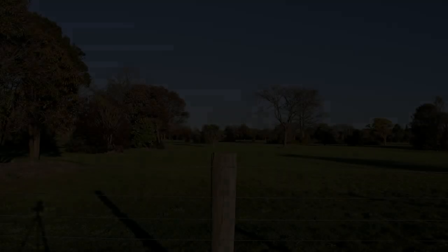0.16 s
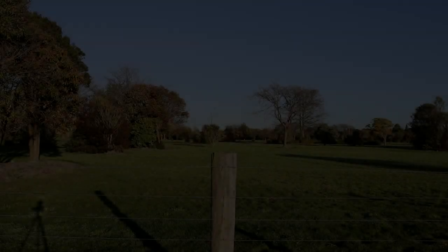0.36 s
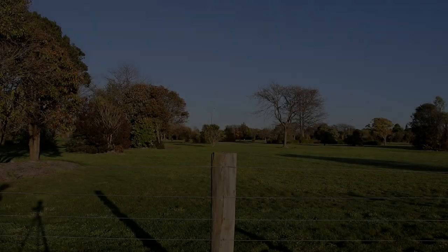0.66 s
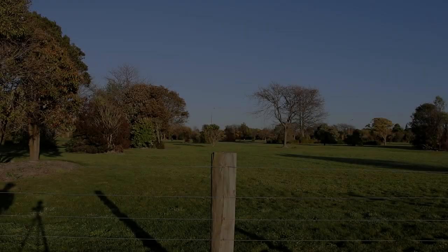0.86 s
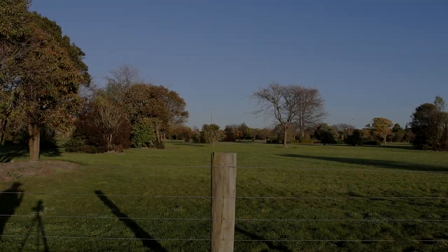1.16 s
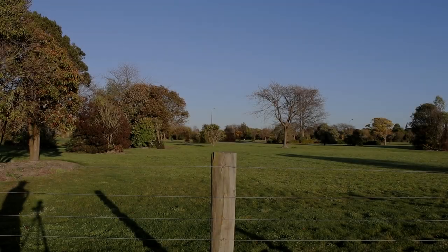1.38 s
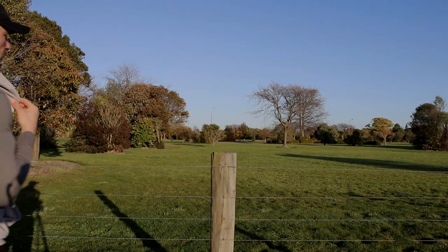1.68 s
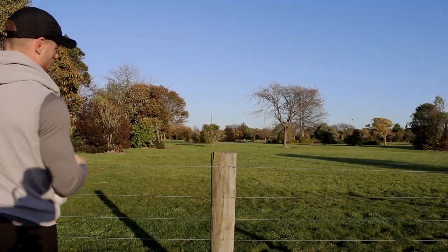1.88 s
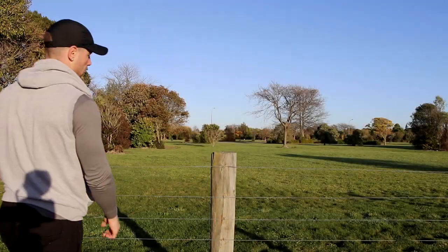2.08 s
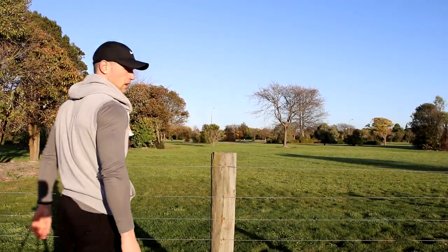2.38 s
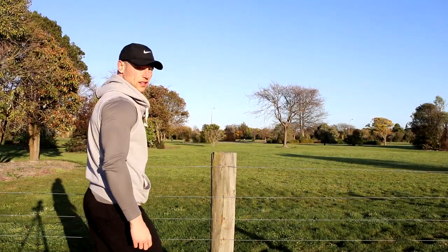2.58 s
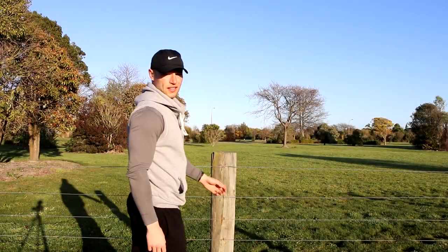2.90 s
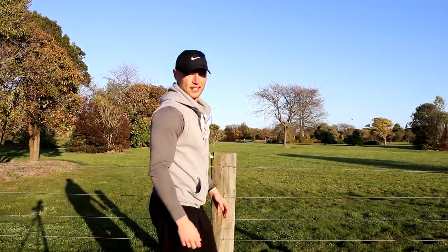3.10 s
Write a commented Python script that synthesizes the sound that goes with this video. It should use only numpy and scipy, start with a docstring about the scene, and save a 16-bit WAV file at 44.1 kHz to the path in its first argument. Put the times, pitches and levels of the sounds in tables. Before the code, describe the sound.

Footsteps on damp grass: soft brushing from 0.3 to 0.75 seconds, a light step near 1.1, then close, crisp crunches around 1.65-1.9, 2.3-2.5 and 2.8-2.95, with cracking stalks and wet turf pops. Low wind rumble buffets the microphone in uneven gusts, strongest near 2.7, over faint open-park air and hiss. A distant bird chirps sparsely early on, then four quick falling chirps from 3.0.

```python
"""Wind rumbles on the microphone over the faint wash of an open park: coloured noise under gust levels.
A small bird far off chirps and whistles now and then: near-pure notes that slide down.
Someone walks over damp grass from behind the microphone and stops close to it. Shoes brush and crush
the blades (coloured showers of clicks), stiff stalks crack (noise bursts) and the wet turf pops under
the weight (short damped rings with gritty ticks). Four more chirps come near the end."""
import sys
import numpy as np
from scipy import signal
from scipy.fft import rfft, irfft
from scipy.io import wavfile
from scipy.ndimage import uniform_filter1d

SR = 44100
rng = np.random.default_rng(int(sys.argv[2]) if len(sys.argv) > 2 else 0)


def transcribe(u):
    """Save the signal u as a 16-bit wav file named by the first command-line argument.

    u: samples, shape (n,) or (channels, n), limited to [-1, 1]; the rate is SR.
    q: integer samples, one column per channel.
    """
    v = np.clip(np.atleast_2d(u).T, -1, 1)
    q = np.round(v * 32767).astype(np.int16)
    wavfile.write(sys.argv[1], SR, q)


N = 143325


def amp(db):
    """Decibels to gain."""
    return 10 ** (np.asarray(db) / 20)


def evened(x):
    """Scales to rms 1."""
    return x / np.sqrt(np.mean(x ** 2) + 1e-20)


def read(points, hz):
    """Reads a table on a log-frequency axis."""
    f, value = np.transpose(points)
    return np.interp(np.log(hz + 1), np.log(f + 1), value)


def add(mix, s, sound):
    """Mixes a sound in at time s, in place."""
    part = mix[max(round(s * SR), 0):][:len(sound)]
    part += sound[:len(part)]


def noise(spectrum):
    """Steady noise of rms 1 with the given colour."""
    gain = amp(read(spectrum, np.fft.rfftfreq(N, 1 / SR)))
    white = rng.standard_normal(N)
    return evened(irfft(rfft(white) * gain, N))


def colour(x, spectrum, size=2048):
    """Causal (minimum-phase) filter of unit energy, so that clicks keep their sharp start."""
    hz = abs(np.fft.fftfreq(size, 1 / SR))
    log_gain = np.log(amp(read(spectrum, hz)))
    response = np.exp(np.conj(signal.hilbert(log_gain)))
    taps = np.fft.ifft(response).real[:size // 2]
    return signal.oaconvolve(x, taps / np.linalg.norm(taps))[:N]


def drift(step_s):
    """A random curve of rms 1 that heads for a new value every step."""
    steps = np.arange(N) / SR / step_s
    return evened(np.interp(steps, np.arange(N), rng.standard_normal(N)))


def grass():
    """Each stroke bends hundreds of blades in clumps, dull sole to fine fizz; they spring back faintly."""
    # shoe strokes through the grass: start_s, length_s, then the levels before the colour shifts:
    # sole_db (soft press), crunch_db, rustle_db, swish_db, fizz_db
    strokes = [(0.305, 0.092, -87, -62, -63.5, -63, -66), (0.36, 0.064, -83, -69, -75, -61, -54),
               (0.489, 0.11, -52, -54.5, -55.5, -58.5, -62), (0.637, 0.13, -62, -71, -63, -64, -70),
               (1.121, 0.11, -48, -53, -53.5, -57, -63), (1.234, 0.11, -85, -71, -66, -62, -63),
               (1.637, 0.072, -50, -52.5, -54.5, -53.5, -59), (1.688, 0.086, -42, -51, -54, -60, -63),
               (1.743, 0.035, -39, -40, -55, -61, -64), (1.758, 0.13, -56.5, -50, -57, -58, -71),
               (2.276, 0.097, -45, -42.5, -50, -54.5, -60), (2.368, 0.082, -51, -40.5, -45, -58, -72),
               (2.456, 0.068, -67, -83, -84, -61, -66), (2.806, 0.065, -41, -48.5, -50.5, -60, -55),
               (2.856, 0.072, -47, -40, -46.5, -54.5, -63)]
    # colours from the press of the sole up through the bending blades: frequency_hz, relative_level_db
    sole = [(100, 0.5), (250, 6), (600, 0.5), (900, -3.5), (2000, -27.5)]
    crunch = [(300, -25.5), (800, 3), (1400, 6), (2200, 5.5), (3200, -0.5), (5000, -48)]
    rustle = [(1500, -20), (2900, 2.5), (4500, 4.5), (5600, 5), (6700, -5), (10000, -13)]
    swish = [(4500, -4), (7300, 8.5), (8800, 7.5), (10800, -1.5), (14000, -29)]
    fizz = [(9000, -10), (11500, -3.5), (12700, -7), (16000, -17)]
    blades_per_s, blade_spread_db = 8000, 5
    clump_db, own_clump_db, clump_s = 3, 1.5, .003  # shared by all layers; each layer's own; step
    attack_share, release_share = .38, .33  # of the stroke length
    recover_db, recover_s = -17, 0.081  # blades springing back after the stroke

    shared_clumps_db = clump_db * drift(clump_s)
    out = np.zeros(N)
    t = np.arange(SR // 2) / SR
    for k, spectrum in enumerate([sole, crunch, rustle, swish, fizz]):
        clumps_db = shared_clumps_db + own_clump_db * drift(clump_s)
        blade_db = blade_spread_db * np.minimum(rng.exponential(1, N), 4)
        is_blade = rng.random(N) < blades_per_s / SR
        blades = amp(clumps_db + blade_db) * rng.choice([-1, 1], N) * is_blade
        drive = np.zeros(N)
        for start, length, *levels_db in strokes:
            u = t / length
            slope = np.minimum(u / attack_share, (1 - u) / release_share)
            press = np.sin(np.pi / 2 * np.clip(slope, 0, 1)) ** 2
            fade = np.exp(-np.maximum(t - length, 0) / recover_s)
            recover = amp(recover_db) * np.minimum(u, 1) * fade
            under_shoe = np.roll(blades, -int(start * SR))[:len(t)]
            stroke = np.maximum(press, recover) * under_shoe
            add(drive, start, amp(levels_db[k]) * stroke / np.std(stroke[u < 1]))
        out += colour(drive, spectrum)
    return shifting(out)


def shifting(x, size=128):
    """Each clump of blades rings at other pitches: random patches of colour come and go."""
    shift_db, shift_hz, shift_s = 2, 1200, .014  # rms depth; width of the smoothing in pitch; in time / 2
    z = signal.stft(x, nperseg=size)[2]
    patches = rng.standard_normal(z.shape)
    patches = uniform_filter1d(patches, round(shift_hz * size / SR), axis=0)
    patches = uniform_filter1d(patches, round(2 * shift_s * SR / size), axis=1)
    gain = amp(shift_db * evened(patches))
    return signal.istft(z * gain, nperseg=size)[1][:N]


def stalks():
    """A stiff stalk flicks off the shoe with a short, bright crack: a decaying noise burst."""
    # cracks: start_s, level_db (before colouring)
    snaps = [(.533, -34), (1.667, -29), (1.672, -30), (1.6825, -24), (1.6868, -24), (1.7122, -26),
             (1.7928, -31), (2.4945, -29), (2.8385, -24), (2.868, -29), (3.1603, -36)]
    # colour of a crack: frequency_hz, relative_level_db
    snap_colour = [(1000, -5), (2600, 3.5), (6400, -4.5), (8900, 3.5), (11000, -13.5), (12700, -3),
                   (15500, -3)]
    snap_s = .0011  # decay time
    t = np.arange(0, 10 * snap_s, 1 / SR)
    out = np.zeros(N)
    for start, db in snaps:
        burst = rng.standard_normal(len(t))
        add(out, start, amp(db) * burst * np.exp(-t / snap_s))
    return shifting(colour(out, snap_colour))


def turf(size=1024):
    """A pocket in the wet turf opens with a sharp, gritty tick of suction and rings for a few cycles."""
    # pops of the wet turf: start_s, level_db, pitch_hz, decay_ms,
    # tick_db (relative to the pop, before the lift below)
    pops = [(0.6628, -22.5, 990, 0.37, -1), (1.0763, -23, 1190, 0.4, -2), (1.199, -16, 1460, 0.77, -28),
            (1.202, -16.5, 1170, 0.77, -17), (1.2978, -20, 378, 0.47, -3), (1.634, -22.5, 1320, 0.48, -19),
            (1.7576, -13, 1470, 0.55, -14), (1.7602, -19, 690, 1.03, -10), (1.773, -17, 1970, 0.71, -15),
            (1.791, -25.5, 1520, 1.1, -19), (1.8148, -17.5, 2380, 0.68, 5.5),
            (1.8173, -4.5, 1760, 0.24, -10), (1.8969, -19, 900, 1.1, -0.5), (1.9005, -21.5, 1930, 1.06, -1),
            (1.9195, -6, 1260, 0.59, 1), (2.0326, -5, 1520, 0.76, 2), (2.2355, -29, 1350, 0.78, 1),
            (2.3737, -20, 1210, 1.1, -1), (2.383, -14, 1360, 0.36, -7), (2.3842, -10.5, 1260, 0.55, -13),
            (2.3895, -13.5, 1790, 1.2, 6), (2.396, -16, 1710, 0.92, 1), (2.3977, -9, 1800, 0.6, -1.5),
            (2.4085, -14, 1490, 1.5, -20), (2.4124, -13.5, 1740, 1.4, -3), (2.42, -17.5, 1690, 1.2, 8),
            (2.4267, -20, 970, 1.3, -8), (2.4334, -19.5, 820, 1.4, -8), (2.5214, -11, 810, 0.2, -24),
            (2.8411, -20.5, 360, 2.2, 10), (2.8502, -16, 1260, 0.61, 5), (2.922, -13.5, 1070, 0.69, -1),
            (2.9669, -25.5, 770, 1.8, -10), (3.098, -20.5, 1740, 0.48, -20)]
    # colour of the ticks: frequency_hz, relative_level_db
    tick_colour = [(600, 10), (1500, 13), (3000, -1.5), (4200, 4), (5600, 6.5), (7000, -12.5), (8600, -2),
                   (10500, -21), (16000, -41)]
    rise_s = 0.000067
    tick_lift_db, tick_s = 1.5, 0.00015
    grit_share = .6  # of the tick's energy; the rest is one bare click

    t = np.arange(size) / SR
    rings, ticks = np.zeros(N), np.zeros(N)
    for start, db, hz, decay_ms, tick_db in [*pops, *tiny_pops()]:
        decay_s = decay_ms / 1000
        envelope = (1 - np.exp(-t / rise_s)) * np.exp(-t / decay_s)
        ring = envelope * np.sin(2 * np.pi * hz * t)
        grit = rng.standard_normal(size) * np.exp(-t / tick_s)
        grit /= np.linalg.norm(grit)
        click = t == 0
        tick = np.sqrt(grit_share) * grit - np.sqrt(1 - grit_share) * click
        add(rings, start, amp(db) * ring)
        add(ticks, start, amp(db + tick_db + tick_lift_db) * tick)
    return rings + colour(ticks, tick_colour)


def tiny_pops():
    """The turf settles under a resting foot: random rows for turf(), of scattered level and pitch."""
    # spells of settling: start_s, end_s, level_db (middle of the random spread)
    settling = [(1.59, 1.65, -37.5), (1.82, 1.94, -41), (1.94, 2.07, -49), (2.07, 2.165, -41),
                (2.165, 2.24, -37.5), (2.45, 2.52, -43.5), (2.93, 3.03, -49)]
    pops_per_s, spread_db = 300, 3.6
    middle_hz, spread_octaves = 1950, .45
    decay_ms, tick_db = .6, -5
    times = np.cumsum(rng.uniform(.2, 1.8, 1400)) / pops_per_s
    rows = []
    for s, (a, b) in zip(times, rng.standard_normal((len(times), 2))):
        for start, end, db in settling:
            if start < s < end:
                pitch_hz = middle_hz * 2 ** (spread_octaves * b)
                rows.append((s, db + spread_db * a, pitch_hz, decay_ms, tick_db))
    return rows


def scatter(x, size=3000):
    """Ground and legs throw back one close echo and a very short tail."""
    echo_s, echo_db = .0059, -21
    tail_s, tail_db = 0.003, -14.5
    tail = rng.standard_normal(size) * np.exp(-np.arange(size) / SR / tail_s)
    out = amp(tail_db) * signal.oaconvolve(x, tail / np.linalg.norm(tail))[:N]
    add(out, echo_s, amp(echo_db) * x)
    return out


def bird(notes, length_s, fall_octaves):
    """Near-pure notes of one shape, which swell, fade and slide down."""
    u = np.linspace(0, 1, int(length_s * SR))
    out = np.zeros(N)
    for start, db, middle_hz in notes:
        hz = middle_hz * 2 ** (fall_octaves * (.5 - u))
        tone = np.sin(2 * np.pi * np.cumsum(hz) / SR)
        add(out, start, amp(db) * np.sin(np.pi * u) ** 2 * tone)
    return out


def wind():
    """Gusts push on the microphone: a deep rumble and lumpy buffeting above it."""
    # wind on the microphone: time_s, rumble_db, buffeting_db
    gusts = [(0, -39, -43.5), (.5, -38.5, -42.5), (.74, -34, -40), (.9, -25.5, -33), (1.019, -24.5, -38),
             (1.1, -35.5, -37), (1.34, -29, -40), (1.45, -30.5, -42), (1.75, -32, -37.5),
             (1.95, -38.5, -44.5), (2.15, -27, -39), (2.24, -33, -42.5), (2.64, -29, -37),
             (2.72, -18.5, -38), (2.82, -32.5, -34), (3.0, -41.5, -41.5), (3.08, -30.5, -39),
             (3.25, -47, -46)]
    # colours of the deep rumble and of the buffeting: frequency_hz, relative_level_db
    rumble = [(3, 1.5), (15, 2.5), (28, 0.5), (42, 1.5), (60, -8.5), (100, -17.5), (200, -69)]
    buffet = [(30, -4), (62, -4.5), (100, -3.5), (150, -6.5), (320, -20), (480, -28), (900, -37),
              (2000, -91)]
    s, rumble_db, buffet_db = np.transpose(gusts)
    t = np.arange(N) / SR
    deep = amp(np.interp(t, s, rumble_db)) * noise(rumble)
    lumpy = amp(np.interp(t, s, buffet_db)) * noise(buffet)
    return deep + lumpy


def air():
    """Faint, even wash of the open park: steady coloured noise."""
    # colour of the wash: frequency_hz, relative_level_db
    air_colour = [(400, 5.5), (1100, 5), (1800, 0), (4500, -2.5), (8000, -5.5), (16000, -8.5)]
    return amp(-54.5) * noise(air_colour)


def hiss():
    """Steady microphone hiss, quieter than the park."""
    # colour of the hiss: frequency_hz, relative_level_db
    hiss_colour = [(100, -43), (230, -4), (700, -1), (2700, -16.5), (6600, -1), (15500, 0.5)]
    return amp(-63) * noise(hiss_colour)


def scene():
    """Nearly mono: only the microphone hiss differs between the ears, with opposite sign."""
    # quick falling bird chirps: start_s, level_db, middle_pitch_hz
    chirps = [(.276, -56, 3000), (.348, -53, 3100), (.616, -57, 3100), (.98, -56, 3300), (1.393, -50, 3150),
              (2.983, -52, 3480), (3.043, -46.5, 3720), (3.11, -47, 3620), (3.18, -46, 3680)]
    # long, faint falling whistles: start_s, level_db, middle_pitch_hz
    whistles = [(.38, -64, 2700), (.76, -58, 2920)]
    steps = grass() + stalks() + turf()
    birds = bird(chirps, length_s=.038, fall_octaves=.6) + bird(whistles, length_s=.15, fall_octaves=.3)
    mid = steps + scatter(steps + birds) + birds + wind() + air()
    side = hiss()
    return np.array([mid + side, mid - side])


def record(dry):
    """The recorder rounds off the sharpest pops by gentle saturation, then limits the band."""
    ceiling_db, edge_hz = -11.5, 15780
    rounded = dry / (1 + (dry / amp(ceiling_db)) ** 4) ** (1 / 4)
    low_pass = signal.firwin(511, edge_hz, window=("kaiser", 9), fs=SR)
    return signal.oaconvolve(rounded, low_pass[None], "same")


dry = scene()
out = record(dry)
transcribe(out)
```